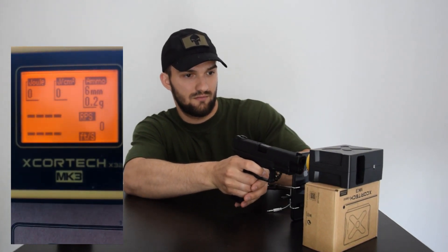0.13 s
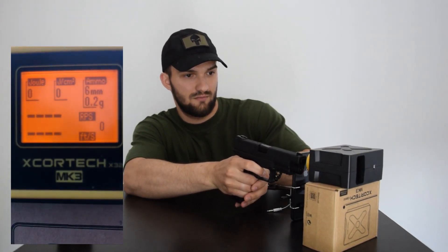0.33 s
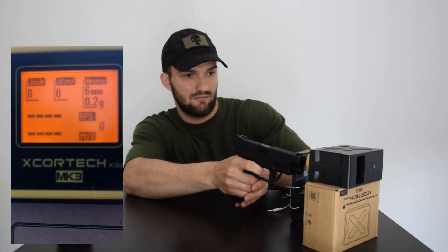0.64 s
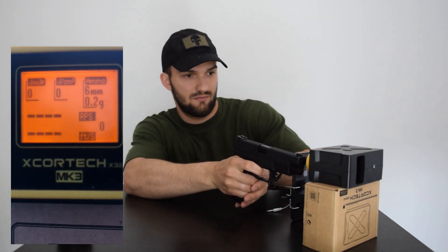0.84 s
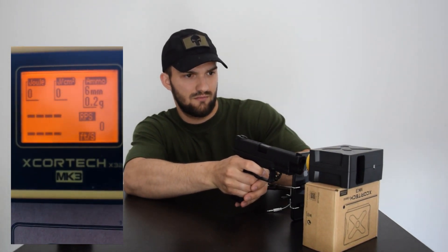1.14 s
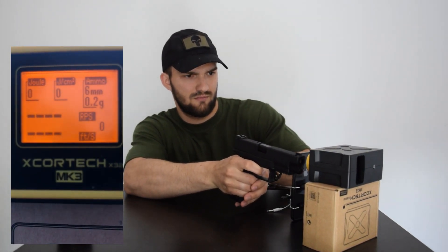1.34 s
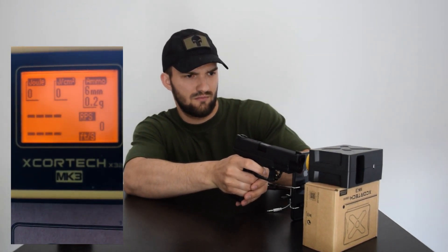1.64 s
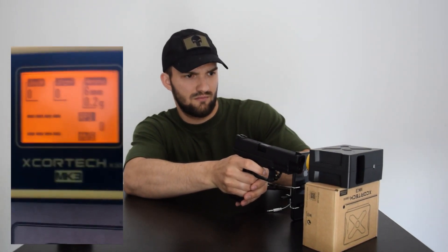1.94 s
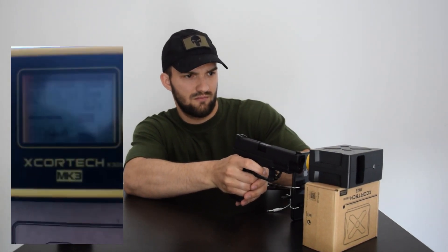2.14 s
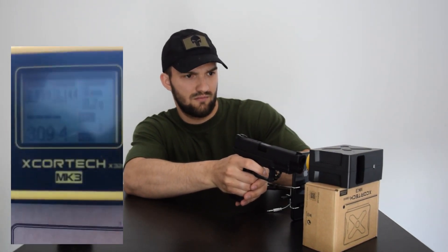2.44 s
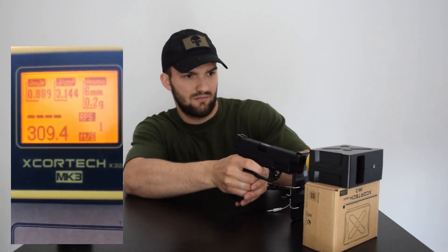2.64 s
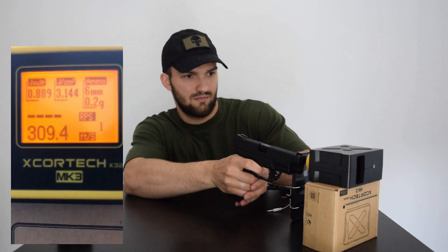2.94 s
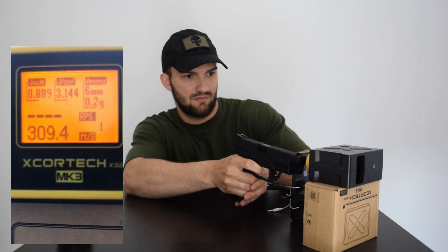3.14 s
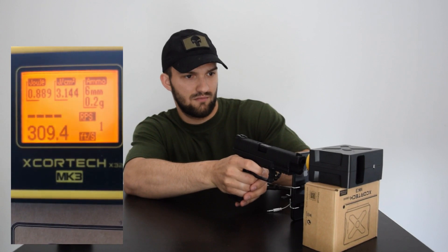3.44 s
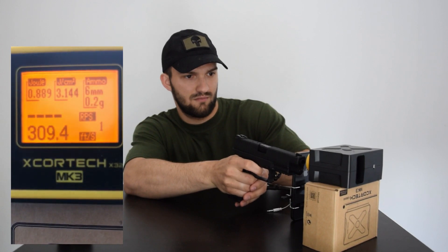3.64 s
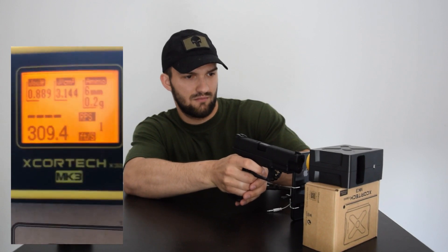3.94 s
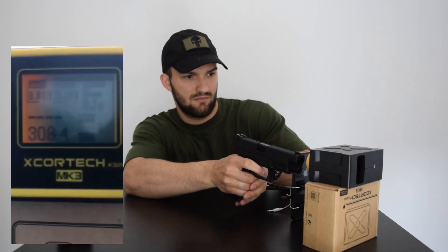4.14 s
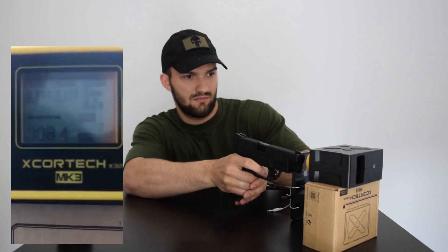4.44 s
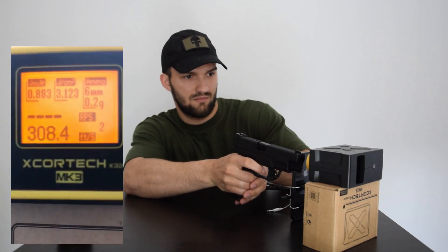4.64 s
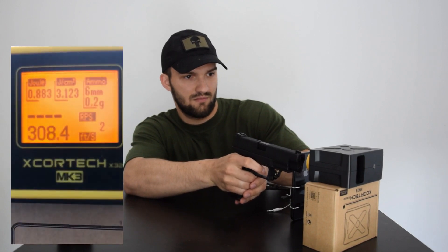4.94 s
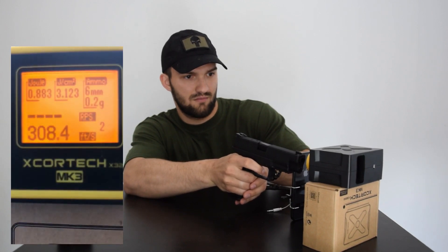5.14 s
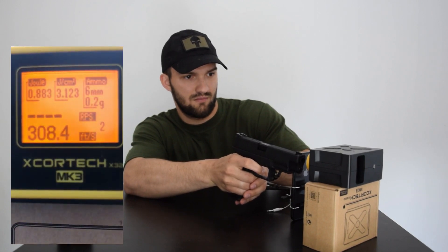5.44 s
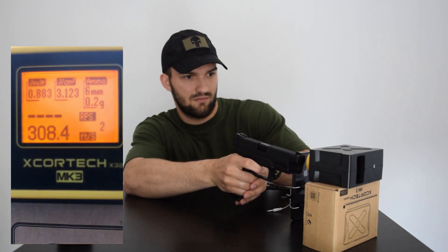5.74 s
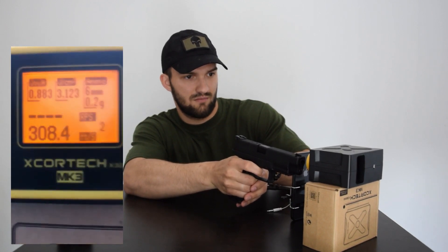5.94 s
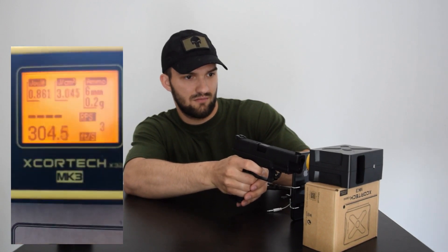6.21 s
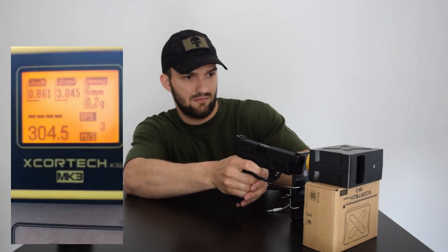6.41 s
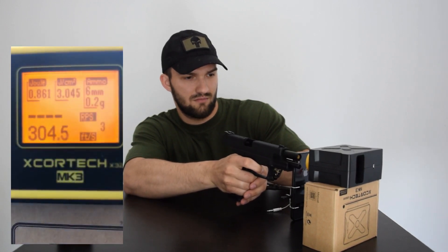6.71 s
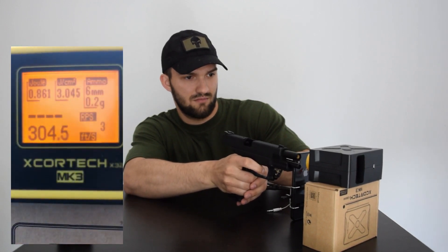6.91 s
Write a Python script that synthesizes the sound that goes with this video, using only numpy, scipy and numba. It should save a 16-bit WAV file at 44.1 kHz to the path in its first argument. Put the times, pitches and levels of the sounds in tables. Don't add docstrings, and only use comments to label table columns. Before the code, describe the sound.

A quiet, bare indoor room: soft low-weighted air noise and preamp hiss, the faint steady whir of a small fan and motor, and a barely audible thin whistle near the top of hearing. At about 1.4 seconds a gas blowback airsoft pistol fires close to the microphone: a tiny valve hiss, then a hard, clipped crack with a gas burst, a short low thump through table and box, and three metallic slide knocks packed into less than a tenth of a second. Hard walls ring on, fading over roughly half a second. Quiet whir and hiss return. At about 3.8 seconds comes the second shot, loudest and brighter, with the same clatter and ring. At about 6.6 seconds the third cracks, bright but slightly softer, its reverberation decaying back into faint room noise. There are no spoken words, only isolated shots and stillness.

```python
import sys
import numpy as np
from scipy import signal
from scipy.fft import rfft, irfft, next_fast_len
from scipy.io import wavfile
from scipy.ndimage import uniform_filter1d
from numba import njit

SR = 44100
rng = np.random.default_rng(int(sys.argv[2]) if len(sys.argv) > 2 else 0)


def undo_db(level):
    steps = np.asarray(level, float) / 20
    return 10 ** steps


def master_out(mix):
    frames = np.transpose(np.atleast_2d(mix))
    ceiling = np.clip(frames, -1, 1)
    pcm = np.round(ceiling * 32767).astype(np.int16)
    wavfile.write(sys.argv[1], SR, pcm)


N = 311787

# (frequency [Hz], density [dB per Hz])
AIR_COLOUR = [(20, -10.5), (50, -3), (110, -4.5), (290, -6.5), (1000, -12.5), (3200, -19.5), (7800, -30.5),
              (15600, -37.5)]
# (frequency [Hz], width [Hz], level [dB])
MOTOR_RESONANCES = [(215, 100, -67), (1520, 53, -84.5), (2200, 160, -75), (2635, 140, -76.5),
                    (2875, 230, -75), (3620, 80, -77), (3832, 280, -61.5), (4000, 70, -69),
                    (4310, 200, -68), (4500, 240, -75), (5370, 150, -84.5), (5920, 300, -77.5),
                    (6320, 340, -76.5), (7040, 500, -76.5)]
# (frequency [Hz], level [dB])
WHISTLE = (15684, -88)
# (time [s], blast level [dB], gas hiss level [dB], brightness [dB per octave])
SHOTS = [
    (1.3730, -6.5, -4, 1),
    (3.7940, -3.5, -3, 1.5),
    (6.6091, -4.5, -4, 1.5),
]
# (level [dB], rise time [s])
HAMMER = (-34, .0010)
# (time after blast [s], level [dB], decay [s])
SLIDE_KNOCKS = [
    (.012, -13, 0.0025),
    (.032, -12.5, .004),
    (.058, -8.5, .006),
]
# (frequency [Hz], density [dB per Hz])
SHOT_COLOUR = [(85, -24.5), (200, -0.5), (550, 0), (900, -3.5), (6300, -2.5), (7300, -9), (10000, -25.5),
               (14000, -39.5)]
# (frequency [Hz], gain [dB])
PORT_COLOUR = [(900, 1), (1300, 3.5), (1900, -3.5), (2700, 0), (3250, 0), (3550, -7), (6300, 0.5)]
# (frequency [Hz], level [dB], T60 [s])
THUMP = (410, -3, 0.013)
# (frequency [Hz], T60 [s])
ROOM_T60 = [(60, 0.95), (250, 0.59), (500, 0.57), (1200, 0.64), (3000, 0.67), (6000, 0.63), (10000, 0.42),
            (14000, 0.22)]
# (frequency [Hz], level [dB], T60 [s])
ROOM_MODES = [(198, -17, .55), (307, -15, .6), (379, -15, .55), (419, -14, .6), (445, -16, .55)]

AIR_DB, SHOT_DB = -60.5, 11.5
GAS_DECAY_S = 0.0072
ROOM_BUILD_S, DIRECT_DB = 0.0033, -5.5
SHIFT = 0.7
CAPSULE_TOP_HZ, TOP_HZ = 14250, 15810
LIMIT_DB, RATIO, ATTACK_S, RELEASE_S = -12.5, 2.8, 0.043, 0.015
CLIP, KNEE = 0.66, 21


def unit(x):
    return x / np.sqrt(np.mean(x ** 2))


def unit_energy(x):
    return x / np.sqrt(np.sum(x ** 2))


def at(points, hz):
    f, v = np.transpose(points)
    return np.interp(np.log(np.maximum(hz, 1)), np.log(f), v)


def shape(x, gain):
    n = next_fast_len(len(x))
    spectrum = rfft(x, n) * gain(np.fft.rfftfreq(n, 1 / SR))
    return irfft(spectrum, n)[:len(x)]


def causal(points, size=1024):
    log_gain = at(points, np.fft.rfftfreq(size, 1 / SR)) * np.log(10) / 20
    cepstrum = irfft(log_gain, size)
    cepstrum[1:size // 2] *= 2
    cepstrum[size // 2 + 1:] = 0
    return unit_energy(irfft(np.exp(rfft(cepstrum)), size))


def even(x, size=16):
    power = uniform_filter1d(np.abs(rfft(x)) ** 2, size)
    hz = np.fft.rfftfreq(len(x), 1 / SR) + 1
    inverse = causal(np.transpose([hz, -10 * np.log10(power)]), size=4096)[:2048]
    return signal.fftconvolve(x, inverse)[:len(x)]


def walk(rate):
    hold = int(SR / rate)
    steps = np.repeat(rng.standard_normal(N // hold + 1), hold)
    return unit(uniform_filter1d(uniform_filter1d(steps, hold), hold)[:N])


def air():
    hiss = unit(shape(rng.standard_normal(N), lambda f: undo_db(at(AIR_COLOUR, f))))
    return undo_db(AIR_DB + 0.16 * walk(2.4)) * hiss


def motor():
    out = np.zeros(N)
    for hz, width, db in MOTOR_RESONANCES:
        band = shape(rng.standard_normal(N), lambda f: 1 / (1 + (2 * (f - hz) / width) ** 4))
        out += undo_db(db + 0.3 * walk(5.9)) * unit(band)
    return out


def whistle():
    hz, db = WHISTLE
    return undo_db(db + 0.6 * walk(3)) * np.sin(2 * np.pi * hz * np.arange(N) / SR)


def hammer(t, noise):
    db, rise = HAMMER
    return undo_db(db) * noise * (t < 0) * np.exp(np.minimum(t, 0) / rise)


def burst(t, decay, noise):
    return unit_energy(noise * (t >= 0) * np.exp(-np.maximum(t, 0) / decay))


def blast_and_slide(t, lead, gas_db, gas_noise, rattle_noise):
    x = undo_db(gas_db) * burst(t, GAS_DECAY_S, gas_noise)
    x[lead] += 1
    for lag, db, decay in SLIDE_KNOCKS:
        x[lead + int(lag * SR)] += undo_db(db)
        x = x + 0.56 * undo_db(db) * burst(t - lag, decay, rattle_noise)
    return even(x)


def thump(t):
    hz, db, t60 = THUMP
    u = np.maximum(t - 0.002, 0)
    return undo_db(db) * np.sin(2 * np.pi * hz * u) * 1000 ** (-u / t60)


def pistol():
    lead, size = 441, 8820
    t = (np.arange(size) - lead) / SR
    crack, pop = np.zeros((2, N + size))
    for s, blast_db, gas_db, tilt_db in SHOTS:
        gas, rattle, valve = rng.standard_normal((3, size))
        x = blast_and_slide(t, lead, gas_db, gas, rattle) + hammer(t, valve)
        tilt = causal([(100, -3 * tilt_db), (12800, 4 * tilt_db)], size=64)
        i = int(s * SR) - lead
        crack[i:i + size] += undo_db(blast_db) * np.convolve(x, tilt)[:size]
        pop[i:i + size] += undo_db(blast_db) * thump(t)
    colour = np.convolve(causal(SHOT_COLOUR), causal(PORT_COLOUR))
    return signal.fftconvolve(crack, colour)[:N], pop[:N]


def room(noise):
    t = np.arange(SR) / SR
    tail = 0
    for hz in 30 * 2 ** np.arange(0, 9.6, 0.5):
        band = shape(noise, lambda f: np.clip(1 - 2 * np.abs(np.log2(np.maximum(f, 1) / hz)), 0, 1))
        tail = tail + band * 1000 ** (-t / at(ROOM_T60, hz))
    tail = unit(even(tail, size=50)) / 5
    for hz, db, t60 in ROOM_MODES:
        tail = tail + 0.42 * undo_db(db) * np.sin(2 * np.pi * hz * t) * 1000 ** (-t / t60)
    tail = unit_energy(tail * (1 - np.exp(-t / ROOM_BUILD_S)))
    tail[0] = undo_db(DIRECT_DB)
    return tail


def capsule(x):
    return signal.sosfilt(signal.ellip(8, 0.5, 50, CAPSULE_TOP_HZ, fs=SR, output="sos"), x)


def scene():
    background = air() + motor() + whistle()
    crack, shots = pistol()
    t = np.arange(N) / SR
    walls = rng.standard_normal(SR)
    for s, *_ in SHOTS:
        echoes = np.sqrt(1 - SHIFT) * walls + np.sqrt(SHIFT) * rng.standard_normal(SR)
        one_shot = crack * (np.abs(t - s) < 1)
        shots = shots + 30 * signal.fftconvolve(one_shot, room(echoes))[:N]
    return (undo_db(SHOT_DB) * capsule(shots) + background)[None]


@njit
def follow(x, attack, release):
    e, out = 0., np.empty(len(x))
    for i in range(len(x)):
        e += (abs(x[i]) - e) * (attack if abs(x[i]) > e else release)
        out[i] = e
    return out


def limiter(x):
    level = follow(x[0], 1 / (ATTACK_S * SR), 1 / (RELEASE_S * SR))
    threshold = undo_db(LIMIT_DB)
    return x * (threshold / np.maximum(level, threshold)) ** (1 - 1 / RATIO)


def overload(x):
    return x / (1 + np.abs(x / CLIP) ** KNEE) ** (1 / KNEE)


def low_pass(x):
    return signal.sosfilt(signal.butter(12, 16990, fs=SR, output="sos"), x)


def record(dry):
    x = overload(limiter(dry))
    mix = shape(x[0], lambda f: np.clip((TOP_HZ - f) / 120, 0.001, 1))[None]
    return low_pass(mix)


dry = scene()
out = record(dry)
master_out(out)
```